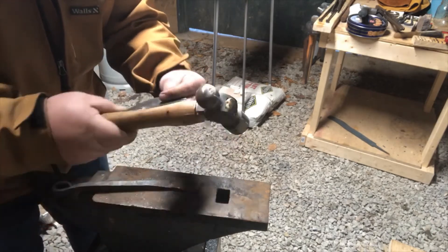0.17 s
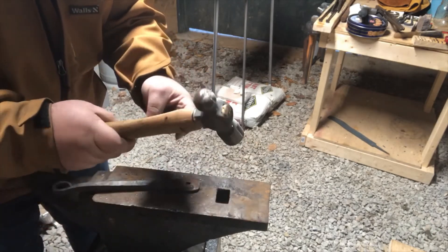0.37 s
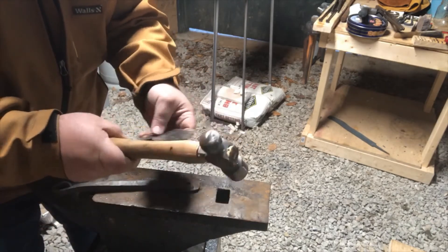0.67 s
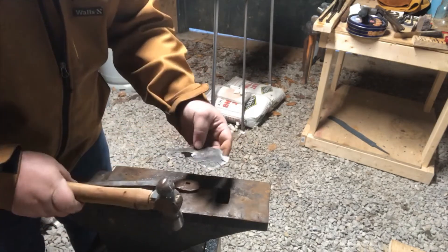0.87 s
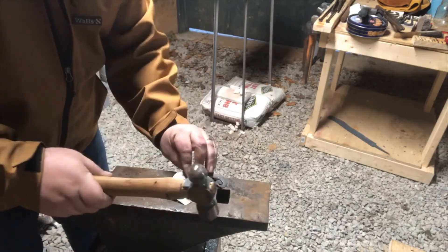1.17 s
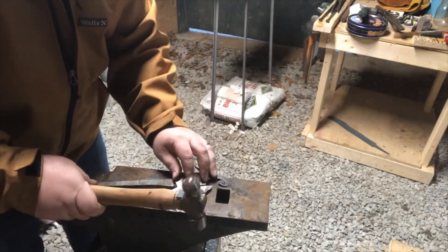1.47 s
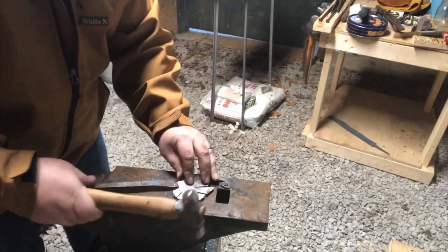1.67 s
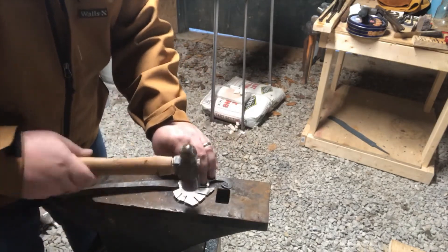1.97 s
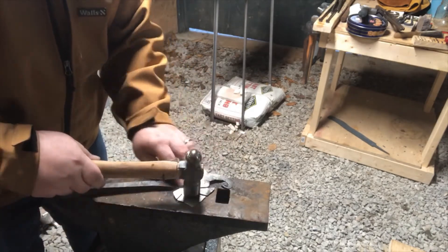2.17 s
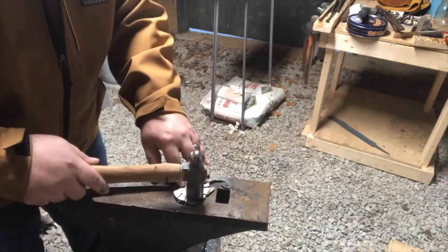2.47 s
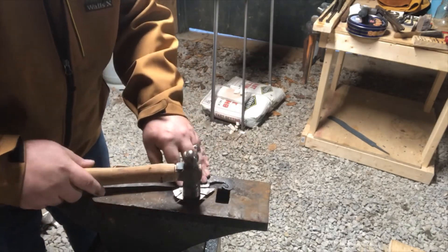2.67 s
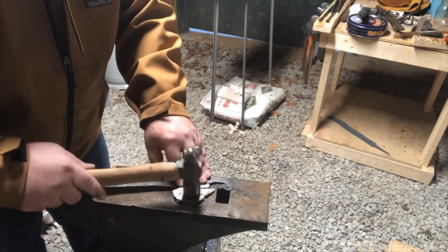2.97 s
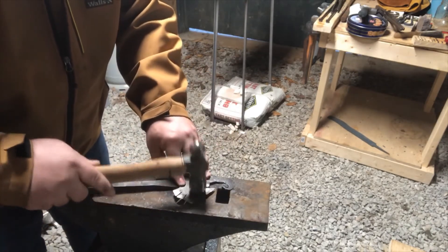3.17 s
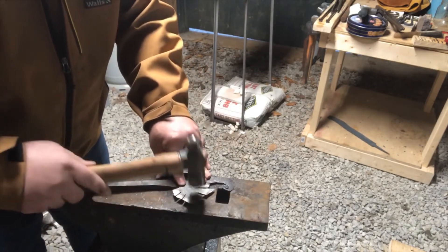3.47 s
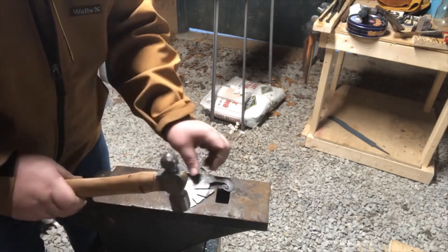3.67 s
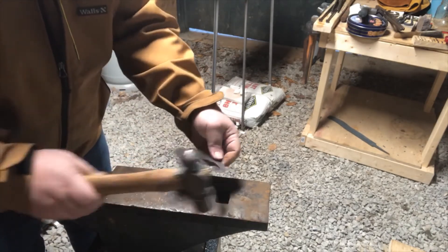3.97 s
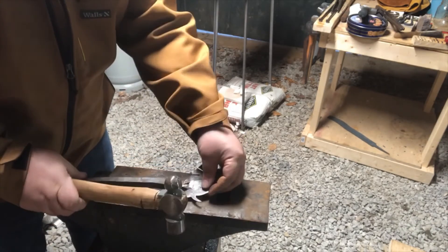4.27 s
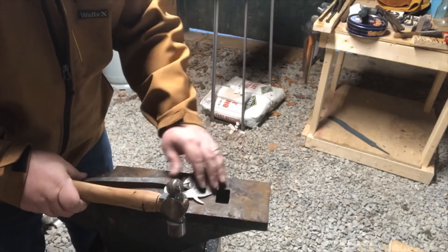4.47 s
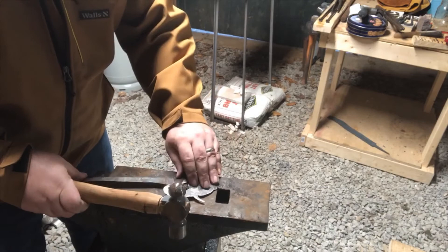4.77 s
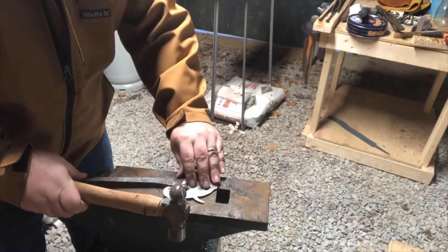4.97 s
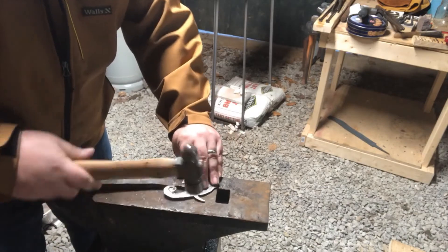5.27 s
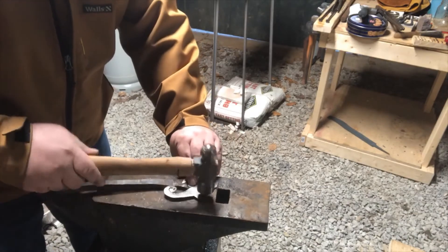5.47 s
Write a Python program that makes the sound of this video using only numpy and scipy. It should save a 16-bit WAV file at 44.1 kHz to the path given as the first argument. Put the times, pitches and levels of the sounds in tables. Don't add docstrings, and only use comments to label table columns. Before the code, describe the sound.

A few light, high metallic ticks and a short scrape come first, then one lighter hit, then ten rapid hard hammer cracks on sheet steel over an anvil, each with a dull thump and tinny slap-back. Handling clinks and cloth rustle follow, then two blows. Close, dry pickup with faint hiss and distant machine hum.

```python
import sys
import numpy as np
from scipy import signal
from scipy.fft import rfft, irfft, next_fast_len
from scipy.io import wavfile
from scipy.ndimage import uniform_filter1d

SR = 44100
rng = np.random.default_rng(int(sys.argv[2]) if len(sys.argv) > 2 else 0)


def invert_db(x):
    u = np.asarray(x, float) / 20
    return 10 ** u


def generate_wav(signal):
    frames = np.transpose(np.atleast_2d(signal))
    scaled = np.clip(frames, -1, 1) * 32767
    pcm = np.round(scaled).astype(np.int16)
    wavfile.write(sys.argv[1], SR, pcm)


N = 247842
TIME_S = np.arange(N) / SR

# (frequency [Hz], density [dB per Hz])
HISS = [(18, -58), (30, -62), (171, -12.5), (261, -10.5), (359, -8.5), (467, -7.5), (858, -7), (953, -8.5),
        (1310, -9), (5590, -10.5), (7280, -13), (14100, -11), (16500, -8.5)]
# (frequency [Hz], width [Hz], level [dB])
MACHINES = [(151.7, 19, -88.5), (264.3, 16, -80.5), (461, 15, -82), (1532, 47, -82.5), (1893, 32, -80.5),
            (2060, 97, -86.5), (2547, 1000, -82)]
# (time [s], rustle level [dB])
SLEEVES = [(0.0, -67.5), (0.12, -62.5), (0.28, -69), (0.74, -68), (0.8, -65), (1.0, -65), (1.27, -63),
           (1.63, -67), (2.0, -65.5), (2.27, -64.5), (2.57, -65), (3.7, -63), (4.1, -58.5), (4.62, -65.5),
           (5.02, -69.5), (5.29, -59.5), (5.5, -65), (5.62, -60.5)]
ROOM_DB, DUCK_DB, DUCK_S = -69, -0.5, 0.26

# (start [s], end [s], level [dB])
SLIDES = [
    (1.322, 1.404, -53.5),
    (3.83, 3.96, -71),
    (4.271, 4.33, -62),
]
# (start [s], end [s], level [dB], frequency [Hz])
DRAGS = [(.46, .7, -73, 5400), (.49, .62, -74, 13100), (5.05, 5.3, -76, 9700), (4.95, 5.3, -77, 5900),
         (4.29, 4.38, -74, 5600), (5.462, 5.497, -58, 14100), (3.88, 3.96, -68, 12400),
         (4.9, 5.37, -73, 460), (5.0, 5.35, -76, 2500), (4.0, 4.2, -75, 380), (4.55, 4.7, -75, 2600)]
SLIDE_GRIP_S, SLIDE_FADE_DB = 0.0059, -4.5

# (time [s], treble peak [dB], high ring [Hz], ring [dB rel], mid band [dB rel])
TAPS = [(0.2064, -42, 15100, -9, 0.5), (1.1367, -36.5, 14200, -24, -19), (1.1543, -36, 14300, -6, -24.5),
        (1.3257, -33, 13600, -14, -22), (1.3718, -32, 14500, -4, -10), (1.4015, -34, 14900, -13, -7),
        (2.1072, -27, 14300, -6.5, -18), (2.176, -45, 13200, -8, -9), (2.3796, -24, 15100, -20, -34),
        (2.7381, -25.5, 13700, -18, -17), (3.6644, -27, 13800, -22, -16), (4.2806, -38.5, 12300, -15, -5.5),
        (4.3558, -39, 12400, -13, -28), (4.4428, -31.5, 14000, 4.5, -14), (4.524, -24.5, 14260, -7.5, -13),
        (4.6784, -39, 14000, -1.5, -10), (4.9764, -43, 14700, -10.5, -7), (5.2277, -60.5, 14800, -17, 11),
        (5.38, -25.5, 14700, -25, -4)]
# (time [s], treble peak [dB], mid band [dB rel])
TICKS = [(1.268, -53, -20), (1.649, -55.5, -1), (2.261, -49.5, -4.5), (2.303, -46, -6), (2.72, -49, -10),
         (3.653, -39.5, -25), (3.763, -47, -18), (3.8388, -46, -19), (3.871, -45.5, -4), (3.902, -43, -28),
         (4.078, -56.5, 0.5), (4.233, -49, -29), (4.315, -55, -2), (4.335, -58, 2), (4.377, -67, -3),
         (4.7606, -49, -5), (5.495, -58, 3)]
# (time [s], peak [dB], frequency [Hz])
RINGS = [(0.2058, -32, 4600), (0.2058, -34, 2090), (1.3268, -40, 1770), (1.3707, -39, 4800),
         (2.1075, -27.5, 10340), (2.3629, -18, 15800), (3.6646, -27, 2730), (3.6651, -29, 4210),
         (4.4432, -33, 5930), (4.4432, -36, 2610), (4.5235, -24, 1164), (4.6772, -41, 4600),
         (4.9775, -39.5, 6040), (5.229, -30.5, 5480), (5.2295, -34.5, 1950), (5.5322, -12.5, 13900)]
# (time [s], peak [dB], frequency [Hz])
KNOCKS = [(0.109, -43, 890), (0.268, -45, 507), (1.402, -39, 580), (2.362, -35, 330), (2.737, -39.5, 165),
          (3.498, -43, 393), (3.665, -31, 760), (4.357, -45, 550), (4.524, -30.5, 306), (5.416, -33, 278),
          (5.532, -17, 280)]
TICK_HZ, TICK_RING_DB, TICK_MID_DB = 12200, -13.5, 1.5
TAP_T60_S, TAP_RING_T60_S, TAP_KNOCK_DB = 0.065, 0.077, -23
RING_T60_S, KNOCK_T60_S = 0.033, 0.025
PAIR_HZ = 330

# (time [s], peak [dB], thump [dB rel], slap-back delay [ms], slap-back [dB rel])
BLOWS = [(2.3637, -19, -28, 5.3, -16), (2.8499, -12, -5, 6.2, -0.5), (2.9277, -5, -12.5, 8.1, -11.5),
         (3.005, -12.5, -13.5, 5.4, -5.5), (3.0824, -9, -8.5, 4.9, -2.5), (3.1671, -10, -12.5, 6, 0),
         (3.247, -12, -16.5, 5.4, 0), (3.3224, -10, -12.5, 8.5, -2), (3.3961, -8, -11, 6.6, -5.5),
         (3.466, -9.5, -9.5, 5.9, -3), (3.5364, -9, -19, 7.3, -5.5), (5.417, -17.5, -20, 10, -16),
         (5.5328, -15, -4, 10, -16)]
# (time [s], peak [dB], frequency [Hz])
SPOTS = [(2.3645, -36, 4370), (2.848, -22, 2000), (2.9269, -23, 3630), (3.005, -26, 3630),
         (3.0819, -10.5, 1100), (3.1686, -15.5, 2880), (3.247, -18.5, 3080), (3.3222, -23, 2300),
         (3.3948, -12, 1580), (3.466, -10, 1820), (3.5358, -14, 1680), (5.416, -30, 2670),
         (5.5329, -19, 1290)]
# (time [s], peak [dB], frequency [Hz])
TONES = [(3.005, -19.5, 570), (3.167, -49, 470), (3.248, -40, 840), (3.322, -19, 880), (3.395, -23, 664),
         (3.536, -27, 660), (5.532, -19, 429), (2.8488, -10, 8140), (2.9271, -8, 7340), (3.0818, -13, 8000),
         (3.1666, -17.5, 8440), (3.3222, -15, 8500), (3.466, -12, 4650), (5.5322, -12.5, 6820)]
MID_DB = -9
SPOT_T60_S, SPOT_T60_POWER = 0.014, 1
TONE_T60_S = 0.021

# (frequency [Hz], level [dB], t60 [s])
SHEET = [(9750, 3, 0.13), (9800, -15, 0.1), (11960, -27, 0.016), (12200, 5.5, 0.099), (13600, -26, 0.021),
         (13700, -11, 0.02), (14700, 0, 0.072)]
# (frequency [Hz], level [dB], t60 [s])
ANVIL = [(111, -20, 0.01), (326, -3, 0.081), (479, -1.5, 0.072), (772, -18, 0.11)]
# (frequency [Hz], density [dB per Hz])
CRACK = [(470, -4), (800, 0.5), (3060, -8), (4330, -13), (8410, -15), (13900, -14.5), (15300, -5.5),
         (16200, -18), (17000, -29.5)]
# (frequency [Hz], density [dB per Hz])
RATTLE = [(59, -17.5), (100, -8.5), (1860, -5.5), (2460, -8), (2800, -6), (4030, -8.5), (5680, -4.5),
          (6190, -7.5), (9520, -8), (10400, -6.5), (14900, 0), (15900, -8.5), (17000, -81)]

# (centre [s], length [ms], depth [dB])
GAPS = [(1.165, 13, -30), (1.903, 24, -35), (2.844, 4, -30), (2.996, 9, -20), (3.078, 5, -30),
        (3.162, 4, -12), (3.315, 8, -18), (3.527, 10, -20), (3.968, 30, -5), (5.401, 26, -70),
        (5.524, 14, -35)]
SHALLOW_GAPS = [.485, .826, .956, 1.595, 2.149, 2.192, 2.408, 2.443, 4.048, 4.176, 4.561, 4.73, 5.026,
                5.477]
SHALLOW_MS, SHALLOW_DB = 14, -13
TOP_HZ, QUIET_TOP_HZ = 16500, 15700


def colour(x, points, lo_hz=0, hi_hz=30000):
    size = next_fast_len(len(x) + 4096)
    hz = np.arange(size // 2 + 1) * SR / size + 1
    point_hz, point_db = np.array(points).T
    gain = invert_db(np.interp(np.log(hz), np.log(point_hz), point_db))
    gain = gain / np.sqrt((1 + (lo_hz / hz) ** 4) * (1 + (hz / hi_hz) ** 4))
    return irfft(rfft(x, size) * gain / np.sqrt(np.mean(gain ** 2)), size)[:len(x)]


def highpass(x, hz):
    return signal.sosfilt(signal.butter(1, hz, "high", fs=SR, output="sos"), x)


def add(track, s, piece):
    i = max(int(s * SR), 0)
    track[i:i + len(piece)] += piece[:N - i]


def wander(count):
    held = np.repeat(rng.standard_normal(N // count + 1), count)[:N]
    return uniform_filter1d(held, size=count)


def grit(rough_db, count=12):
    noise = rng.standard_normal(N)
    jumps = np.repeat(rng.standard_normal(N // count + 1), count)[:N]
    x = noise * invert_db(rough_db * jumps)
    return x / np.std(x)


def narrow(hz, width_hz):
    return colour(rng.standard_normal(N), [(hz - width_hz, -35), (hz, 0), (hz + width_hz, -35)])


def puff(rise_s, t60_s):
    t = np.arange(int(SR * .12)) / SR
    return (1 - np.exp(-(t / rise_s) ** 2)) * invert_db(-60 * t / t60_s)


def ring(modes, chance, spread_db, stretch):
    t = np.arange(int(SR * .12)) / SR
    total = np.zeros(len(t))
    for (hz, db, t60_s), c in zip(modes, chance):
        decay = invert_db(db + spread_db * c - 60 * t / (t60_s * stretch))
        total += decay * np.sin(2 * np.pi * hz * (1 + 0.01 * c) * t)
    return (1 - np.exp(-t / .0003)) * total


def tone(hz, t60_s, stretch):
    return ring([(hz, 0, t60_s)], [0], 0, stretch)


def crack_shape(peak_s, fall_s):
    t = np.arange(int(SR * .02)) / SR - .005 - peak_s
    return np.where(t < 0, np.exp(-(3 * t / peak_s) ** 2 / 2), np.exp(-t / fall_s))


def snap(noise, fall_s, lo_hz, hi_hz):
    piece = colour(crack_shape(.0013, fall_s) * noise, CRACK, lo_hz, hi_hz)
    return piece / np.max(np.abs(piece))


def air():
    flicker = wander(count=1500)
    sleeve_db = np.interp(TIME_S, *np.transpose(SLEEVES))
    duck_db = sum(DUCK_DB * np.exp(-np.abs(TIME_S - s) / DUCK_S) * (TIME_S > s) for s, *_ in BLOWS)
    room_db = ROOM_DB + .5 * flicker + .25 * (sleeve_db + 68.5)
    hum = colour(rng.standard_normal(N), HISS, hi_hz=2560) * invert_db(room_db)
    for hz, width_hz, db in MACHINES:
        hum = hum + invert_db(db + 3.24 * wander(count=5000)) * narrow(hz, width_hz)
    rustle = np.zeros(N)
    for lo_hz, hi_hz, db in ((2700, 7000, -6.5), (6000, 11700, -6.5), (11200, 34000, -5.5)):
        rustle += invert_db(db + 3.2 * wander(count=2500)) * colour(grit(1.2), HISS, lo_hz, hi_hz)
    return (hum + rustle * invert_db(sleeve_db + 2.6 * flicker)) * invert_db(duck_db)


def slides():
    level = np.zeros(N)
    for start, end, db in SLIDES:
        corners_s = [start, start + SLIDE_GRIP_S, end - SLIDE_GRIP_S, end]
        level += invert_db(db) * np.interp(TIME_S, corners_s, [0, 1, invert_db(SLIDE_FADE_DB), 0])
    slips = grit(5.5) * level
    body = ring(SHEET, np.zeros(len(SHEET)), 0, .22)
    out = signal.fftconvolve(slips, body / np.linalg.norm(body))[:N] * invert_db(-1.5)
    out = out + colour(slips, RATTLE, lo_hz=2940) * invert_db(-0.5)
    for start, end, db, hz in DRAGS:
        corners_s = start + (end - start) * np.array([0, .15, .6, 1])
        swell = np.interp(TIME_S, corners_s, [0, 1, 1, 0])
        out = out + invert_db(db) * narrow(hz, min(1300, hz / 3)) * swell
    return out


def taps():
    high, mid, low, direct = np.zeros((4, N))
    ticks = [(s, db, TICK_HZ, TICK_RING_DB, TICK_MID_DB + mid_db) for s, db, mid_db in TICKS]
    rows = TAPS + ticks
    chance = rng.standard_normal((len(rows), len(SHEET)))
    noise = rng.standard_normal((len(rows), 2, int(SR * .02)))
    for (s, db, hz, ring_db, mid_db), c, n in zip(rows, chance, noise):
        add(direct, s - .005, invert_db(db - 5.5) * snap(n[0], 0.0014, 5650, 33000))
        add(direct, s - .005, invert_db(db + mid_db) * snap(n[1], 0.0005, 1700, 8100))
        add(direct, s + 0.0003, -invert_db(db + TAP_KNOCK_DB - 12) * puff(0.00029, 0.035))
        high_tail = puff(0.0011, 0.0067) + invert_db(-7.5) * puff(0.00067, TAP_T60_S)
        add(high, s + 0.00046, invert_db(db - 9.5) * high_tail)
        mid_tail = puff(0.0015, 0.01) + invert_db(-1.0) * puff(0.0021, TAP_T60_S)
        add(mid, s, invert_db(db + mid_db - 4.5) * mid_tail)
        add(low, s, invert_db(db + TAP_KNOCK_DB + 1.5) * puff(0.0029, 0.031))
        beating = [(hz + k * PAIR_HZ, -3 * abs(k), TAP_RING_T60_S / (1 + abs(k)))
                   for k in (1, 0, 2.5, -3.5)]
        add(direct, s + 0.0012, invert_db(db + ring_db) * ring(beating, c * .7, 1, 1))
        add(direct, s + 0.0012, invert_db(db - 31.5) * ring(SHEET, c, 3.7, .6))
    for table, t60_s in ((RINGS, RING_T60_S), (KNOCKS, KNOCK_T60_S)):
        for s, db, hz in table:
            add(direct, s + 0.0008, invert_db(db - 8.0) * tone(hz, t60_s, 0.65))
    for s, db, hz in KNOCKS:
        add(low, s, invert_db(db - 25.5) * puff(0.0038, 0.033))
    tails = colour(high * grit(2.1), RATTLE, lo_hz=7400)
    tails = tails + colour(mid * grit(8.3), RATTLE, lo_hz=1590, hi_hz=7200)
    tails = tails + colour(low * grit(3.6), RATTLE, lo_hz=246, hi_hz=1480)
    return tails + highpass(direct, 50)


def hammer():
    crack, tail, sizzle, boom, thump = np.zeros((5, N))
    chance = rng.standard_normal((len(BLOWS), len(ANVIL)))
    noise = rng.standard_normal((len(BLOWS), 2, int(SR * .02)))
    for (s, db, thump_db, lag_ms, slap_db), c, n in zip(BLOWS, chance, noise):
        add(tail, s - .005, invert_db(db - 38.5) * puff(0.00024, 0.096))
        add(crack, s - .005, invert_db(db + 2) * snap(n[0], .0005, 7000, 30000))
        add(crack, s - .005, invert_db(db + slap_db + MID_DB) * snap(n[1], 0.0012, 1270, 5900))
        add(tail, s + 0.00014, invert_db(db + slap_db - 8.5) * puff(0.0056, 0.075))
        add(sizzle, s + 0.00063, invert_db(db + slap_db / 2 - 15.5) * puff(0.0016, 0.085))
        add(boom, s + 0.0028, invert_db(db + slap_db - 33.5) * puff(0.0055, 0.15))
        add(tail, s + lag_ms / 1000 - .001, invert_db(db + slap_db - 7.5) * puff(0.00067, 0.017))
        add(tail, s + 2 * lag_ms / 1000, invert_db(db + slap_db - 21.5) * puff(0.00087, 0.024))
        add(thump, s + 0.00109, -invert_db(db - 7.5) * puff(.00004, 0.0007))
        anvil = puff(0.00016, 0.0046) + invert_db(-17.5) * ring(ANVIL, c, 1.6, 0.61)
        add(thump, s + 0.00088, -invert_db(db + thump_db) * anvil)
    for s, db, hz in SPOTS:
        lean = colour(rng.standard_normal(int(SR * .12)), [(hz / 1.7, -30), (hz, 0), (hz * 1.5, -30)])
        add(crack, s + .002, invert_db(db - 26.5) * puff(0.0083, 0.073) * lean)
        t60_s = SPOT_T60_S * (hz / 2000) ** SPOT_T60_POWER
        add(crack, s + 0.001045, invert_db(db - 1.0) * tone(hz, t60_s, 0.47))
    for s, db, hz in TONES:
        add(crack, s + 0.001053, invert_db(db - 7.0) * tone(hz, TONE_T60_S, 0.55))
    rattle = colour(tail * grit(2.93, count=40), RATTLE)
    rattle = rattle + colour(sizzle * grit(2.3, count=90), RATTLE, lo_hz=11100)
    return crack + rattle + boom * narrow(467, 380) + highpass(thump, 40)


def scene():
    return (hammer() + taps() + slides() + air())[None]


def dropouts(x):
    gain, kept = np.ones(N), np.zeros(N)
    t = np.arange(-.04, .04, 1 / SR)
    bass = signal.sosfiltfilt(signal.butter(2, 200, fs=SR, output="sos"), x)
    upper = x - bass
    for s, ms, db in GAPS + [(s, SHALLOW_MS, SHALLOW_DB) for s in SHALLOW_GAPS]:
        add(gain, s + t[0], -np.exp(-(1800 * t / ms) ** 6) * (1 - invert_db(db)))
        start = s - ms / 2000 - .012
        lines = np.abs(rfft(upper[0, int(start * SR):][:768] * np.hanning(768)))
        bands = ((9, 26), (26, 60), (60, 120), (150, 265))
        hz = np.array([[lo + np.argmax(lines[lo:hi])] for lo, hi in bands]) * SR / 768
        tones = np.sin(2 * np.pi * hz * t + hz).sum(axis=0)
        add(kept, s + t[0], (10 < ms < 25) * np.exp(-(t / .013) ** 4) * tones)
    return bass + upper * gain + invert_db(-71.5) * kept


def low_pass(x):
    return signal.sosfilt(signal.butter(12, 17170, fs=SR, output="sos"), x)


def record(dry):
    x = dropouts(np.tanh(dry / .9) * .9)
    x = signal.sosfiltfilt(signal.butter(10, TOP_HZ, fs=SR, output="sos"), x)
    dull = signal.sosfiltfilt(signal.ellip(8, .1, 60, QUIET_TOP_HZ, fs=SR, output="sos"), x)
    loud = np.clip(uniform_filter1d(np.abs(x), size=128) / invert_db(-41) - 1, 0, 1)
    mix = dull + loud * (x - dull)
    return low_pass(mix)


dry = scene()
out = record(dry)
generate_wav(out)
```